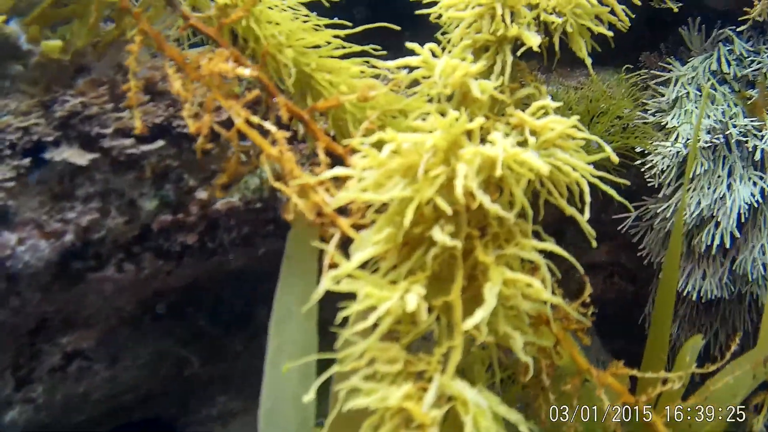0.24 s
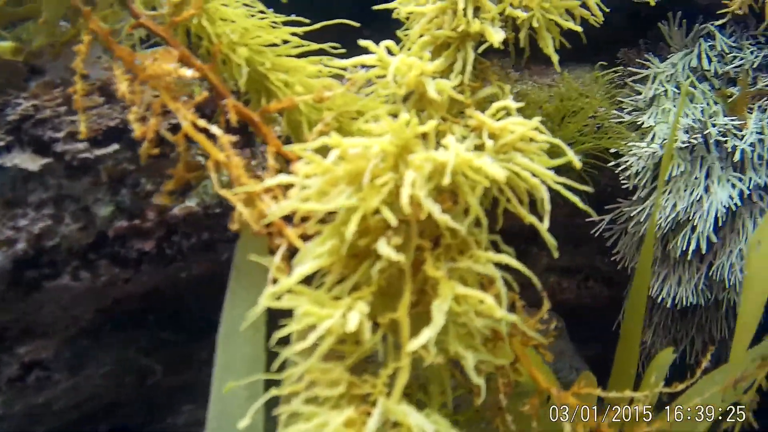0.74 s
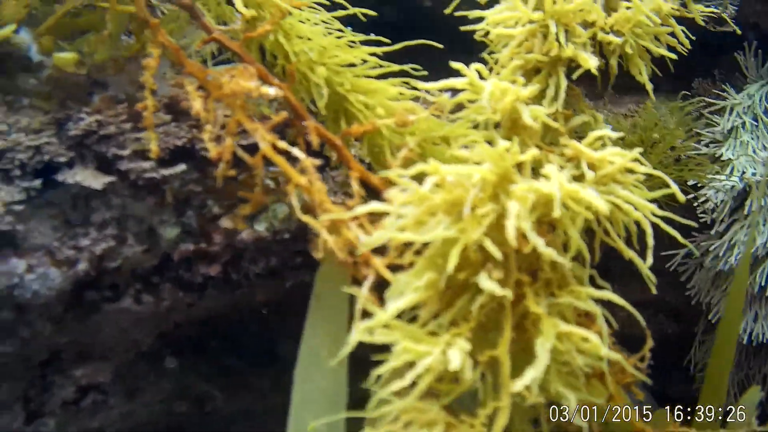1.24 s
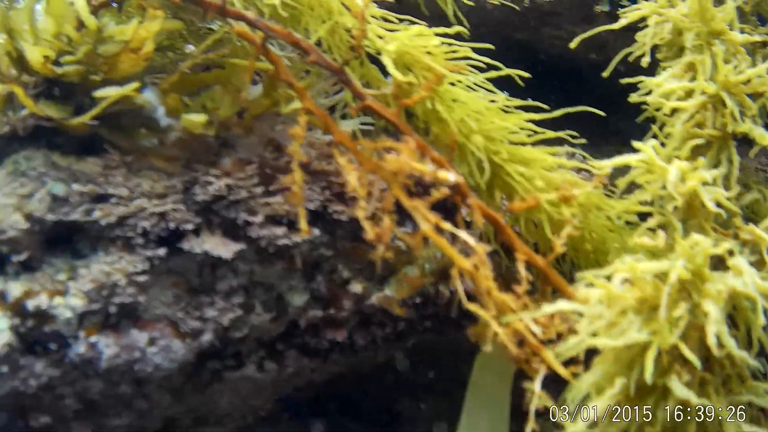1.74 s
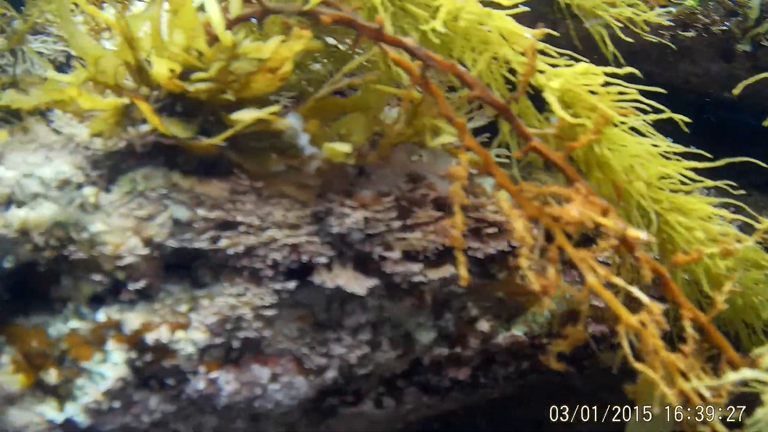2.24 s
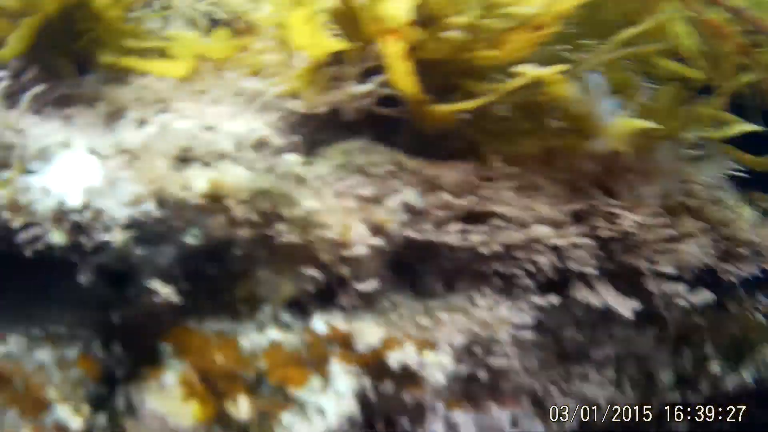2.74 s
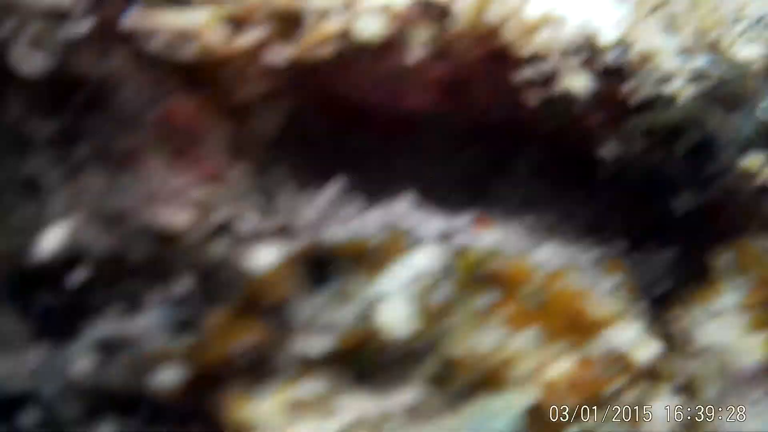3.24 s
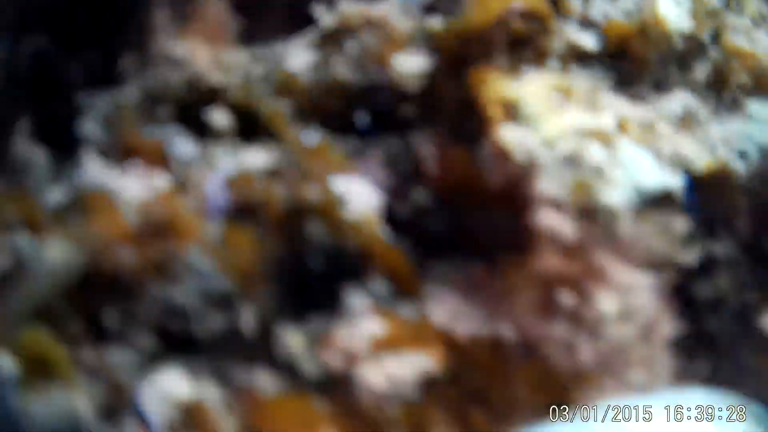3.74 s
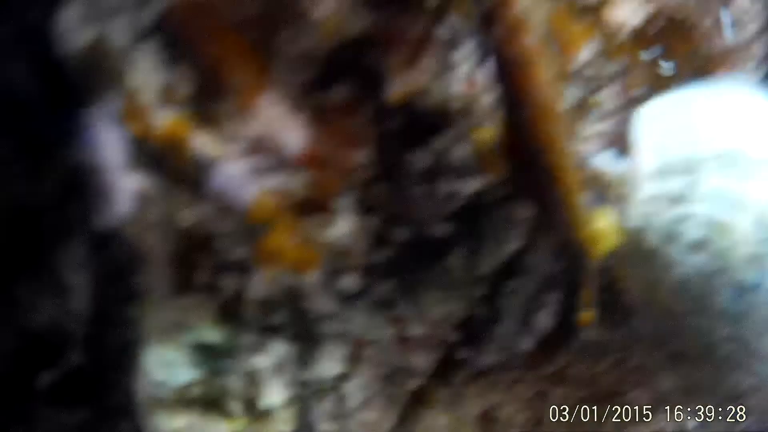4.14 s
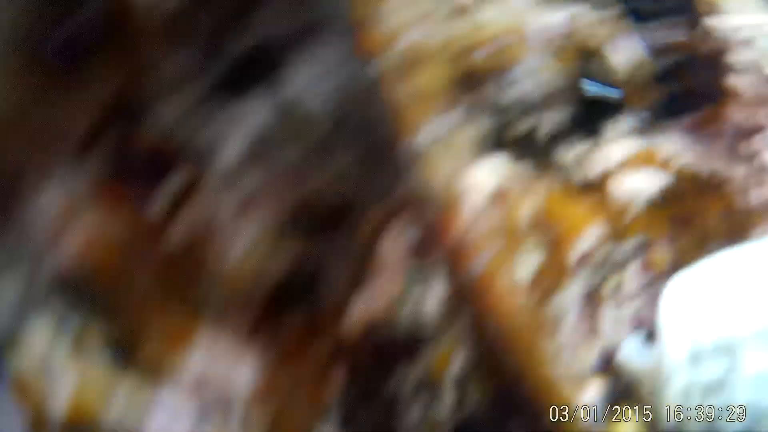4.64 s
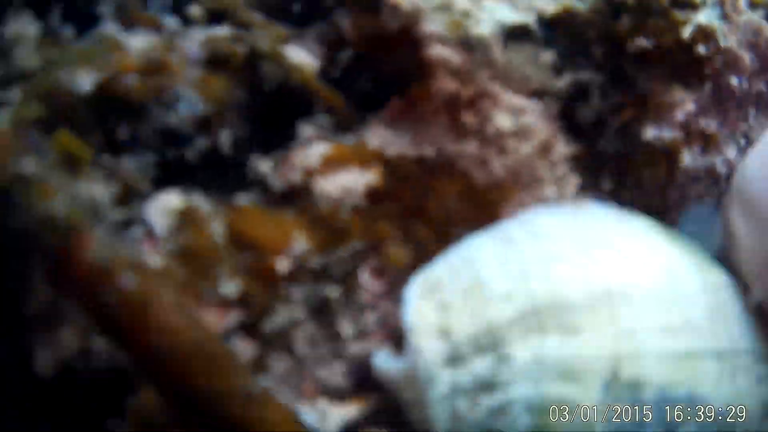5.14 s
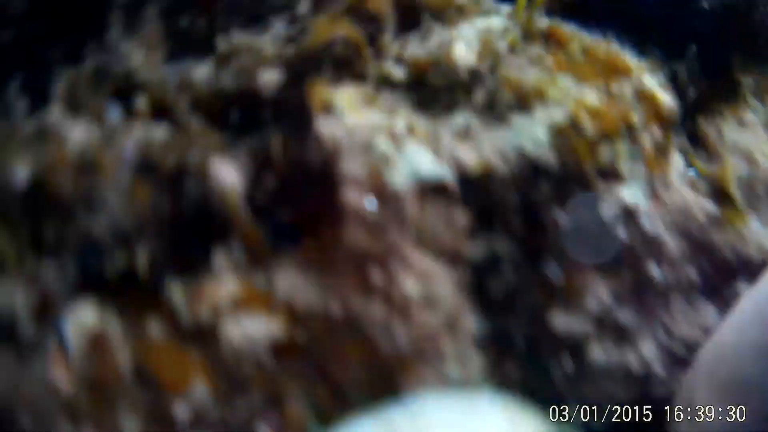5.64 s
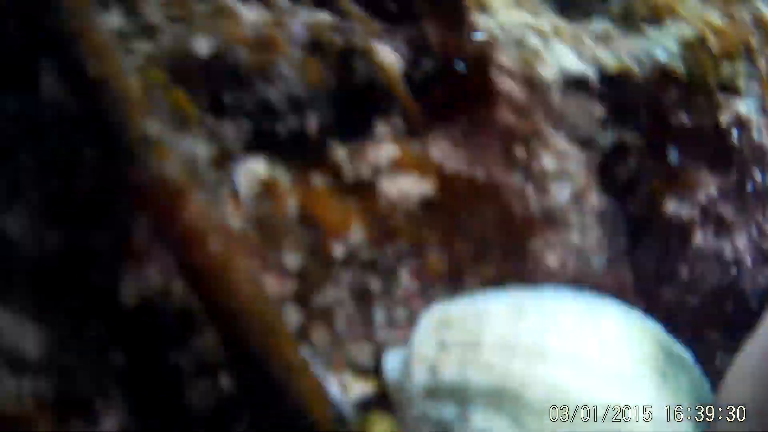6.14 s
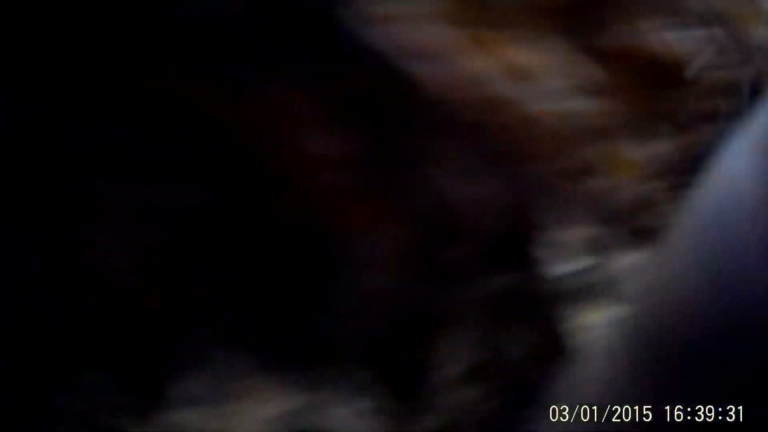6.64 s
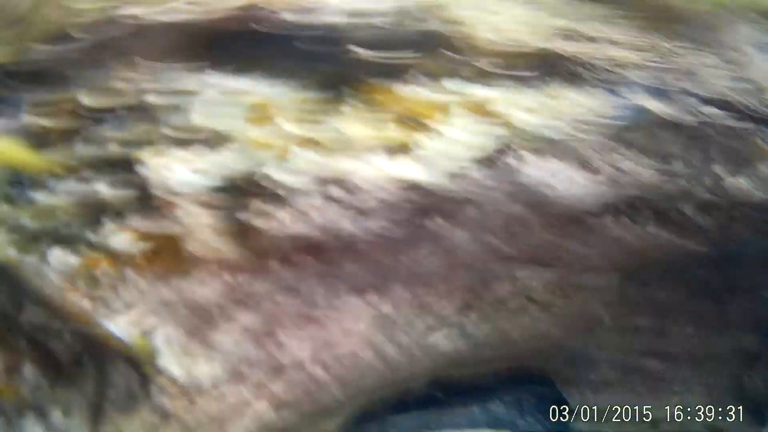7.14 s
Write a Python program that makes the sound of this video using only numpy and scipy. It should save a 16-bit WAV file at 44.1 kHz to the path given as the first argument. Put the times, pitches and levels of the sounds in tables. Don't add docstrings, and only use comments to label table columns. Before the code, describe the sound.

Heard from inside a sealed plastic housing in a shallow rock pool. From 0 to 2.5 seconds it is almost silent: faint hiss, a thin high warbling whine and tiny buzzing electronic ticks, stopping and restarting. From about 2.6 seconds light grit rubs and small ticks appear and swell. A sharp, loud plastic click lands near 3.4, followed by quiet rubbing and clearer circuit buzz. Around 3.9 to 4.1 a tight cluster of cracks and a harsh scrape comes with a low watery push. A lull with soft rubbing and fluttering electronics lasts until 4.9. Clicks at 4.9 and 5.0, then hollow knocks and a boomy thud at 5.25 to 5.5, scattered taps, and a bright crack at 5.9. After lighter taps, the heaviest knocks, shell clatter and gritty grinding run from 6.5 to 7.15, easing into a faint rub by 7.4.

```python
import sys
import numpy as np
from scipy import signal
from scipy.fft import rfft, irfft, next_fast_len
from scipy.io import wavfile
from scipy.ndimage import uniform_filter1d, map_coordinates

SR = 44100
rng = np.random.default_rng(int(sys.argv[2]) if len(sys.argv) > 2 else 0)


def rack_gain(trim_db):
    fader = np.asarray(trim_db, float)
    return 10 ** (fader / 20)


def generate_wav(signal):
    frames = np.transpose(np.atleast_2d(signal))
    scaled = np.clip(frames, -1, 1) * 32767
    pcm = np.round(scaled).astype(np.int16)
    wavfile.write(sys.argv[1], SR, pcm)


N = 325899


def unit(x):
    return x / np.sqrt(np.mean(x ** 2) + 1e-20)


def curves(rows):
    s, *cols = np.transpose(rows)
    return [np.interp(np.arange(N) / SR, s, c) for c in cols]


def wobble(rate_hz):
    knots = rng.standard_normal(int(N * rate_hz / SR) + 4)
    return map_coordinates(knots, [np.arange(N) * rate_hz / SR])


def filtered(x, response):
    m = next_fast_len(len(x) + 4096)
    return irfft(rfft(x, m) * response(np.fft.rfftfreq(m, 1 / SR)), m)[:len(x)]


def colour(points):
    f, db = np.transpose(points)
    return lambda hz: rack_gain(np.interp(np.log(hz + 1), np.log(f + 1), db))


def body(modes):
    def response(f):
        total = 0
        for k, (centre, width, db) in enumerate(modes):
            damping = 1j * f * width
            total = total + (-1) ** k * rack_gain(db) * damping / (centre * centre - f * f + damping)
        return total
    return response


def burst(rise_s, t60_s, response, push=0):
    t = np.arange(SR // 16) / SR
    envelope = (1 - np.exp(-t / rise_s)) * rack_gain(-60 * t / t60_s)
    puff = filtered((push + rng.standard_normal(len(t))) * envelope, response)
    return puff / np.abs(puff).max()


# (frequency [Hz], level [dB])
GRIT_COLOUR = [(1060, -13.5), (1800, -6.5), (2620, -1), (3000, -7.5), (3850, 3), (4260, 1.5), (5130, -0.5),
               (5580, 1.5), (6290, -5.5), (7790, 3.5), (10100, -14), (14800, -23), (16500, -51)]
# (frequency [Hz], level [dB])
SNAP_COLOUR = [(300, -10), (4000, -9.5), (8200, 7), (14000, -41)]
# (frequency [Hz], level [dB])
BLUNT_COLOUR = [(350, -10), (700, 3), (2300, 4), (4000, -15), (12000, -39)]
# (centre [Hz], width [Hz], level [dB])
LID_MODES = [(5890, 160, -3), (7800, 620, 5), (3340, 260, 5), (8560, 300, -31)]
# (centre [Hz], width [Hz], level [dB])
WALL_MODES = [(1262, 71, 7.5), (1411, 108, 8.5), (1946, 550, -5.5), (645, 230, -10)]
# (centre [Hz], width [Hz], level [dB])
CASE_MODES = [(297.7, 21, -1), (354, 82, 5), (528, 52.5, 3), (714, 330, -6.5), (202, 470, -9)]


def contacts():
    out, t = np.zeros(N + SR), np.arange(SR // 16) / SR
    grip = np.exp(-(t / 0.0053) ** 3)
    for s, click_db, hz, knock_db, thud_db in touches():
        wander = np.cumsum(rng.normal(0, .1, len(t)))
        ring_t60_s = 0.021 * np.clip(hz / 5400, .55, 1)
        ring = np.sin(2 * np.pi * hz * t + wander) * rack_gain(-60 * t / ring_t60_s) * (1 - np.exp(-t / 0.0002))
        hard = np.clip(hz / 2100 - .8, .05, 1)
        firm = np.clip((click_db + 32) / 12, .1, 1)
        crack = .5 * burst(0.000086, 0.013, colour(GRIT_COLOUR))
        crack += 0.53 * burst(0.001, 0.0028, colour(SNAP_COLOUR))
        click = grip * (0.66 * firm * ring + hard * crack)
        click += 0.24 * hard * burst(0.0016, 0.0097, body(LID_MODES))
        knock = burst(0.000084, 0.0012, body(WALL_MODES), push=1.44)
        knock += 0.41 * burst(0.00027, 0.011, colour(BLUNT_COLOUR))
        thud = burst(0.0027, 0.016, body(CASE_MODES))
        hit = rack_gain(click_db - 1.5) * click + rack_gain(knock_db - 4.5) * knock + rack_gain(thud_db - 2.0) * thud
        out[round(s * SR):][:len(t)] += hit
    return out[:N]


# (time [s], level [dB])
LID_TAPS = [(2.7165, -29), (3.1399, -26), (3.422, -7.5), (3.9362, 0), (3.9699, -6.5), (4.017, -24),
            (4.1971, -22.5), (5.1907, -7), (5.333, -7), (5.4463, -3.5), (5.604, -17), (5.7327, -24),
            (5.8203, -16), (5.8484, -9), (6.012, -17.5), (6.142, -21.5), (6.1843, -13.5), (6.221, -7.5),
            (6.531, -20), (6.6553, -4.5), (6.726, -6)]
# (time [s], level [dB], flight [s], rebound over tap [dB])
LID_REBOUNDS = [(3.3809, 7.5, 0.0092, -19.5), (3.912, -1, 0.017, -3), (4.034, -5.5, .0118, 6.5),
                (4.9076, -6, 0.017, -18), (5.0265, 0.5, 0.019, -12.5), (5.3841, -10, 0.013, -11),
                (5.914, 3.5, .0093, -7), (6.303, -5, 0.012, -13), (6.832, 2.5, 0.0082, -5.5),
                (7.1091, -7.5, 0.0122, 3.5)]
# (time [s], level [dB], ring [Hz])
SHELL_CHIPS = [(2.8089, -30.5, 6700), (3.0107, -27.5, 9250), (3.0562, -27, 6160), (3.3054, -23, 7000),
               (3.961, -16, 3230), (4.098, -22, 3700), (4.123, -14, 6700), (5.438, -15, 7300),
               (5.4914, -15.5, 3500), (5.5175, -4, 5680), (5.597, -22, 7500), (5.6273, -8.5, 7540),
               (5.9585, -19, 7340), (5.9855, -16.5, 7100), (6.001, -23, 7800), (6.0258, -14.5, 7020),
               (6.5871, 0.5, 7400), (6.611, -5.5, 7700), (6.622, -6, 7460), (6.637, -6.5, 4770),
               (6.647, 1, 6820), (6.67, -2.5, 2230), (6.809, -16.5, 6740), (6.871, -17, 7100),
               (6.9232, -8, 9180), (6.9613, -2.5, 7800), (6.982, -10.5, 7140), (7.0088, -11, 8250),
               (7.0452, -3.5, 7270)]
# (time [s], knock [dB], click [dB], click ring [Hz])
WALL_KNOCKS = [(2.588, -41, -50, 3170), (2.692, -37, -42, 3100), (3.366, -17.5, -17, 3040),
               (3.7206, -18.5, -12, 1800), (3.8953, -17.5, -13, 3180), (4.339, -29.5, -23.5, 3340),
               (5.1452, -31.5, -52, 1720), (5.2202, -34, -20.5, 2170), (5.2314, -20.5, -19, 2600),
               (5.2523, -2, -9.5, 2420), (5.2634, -24, -18, 2700), (5.3569, -3, -10, 4240),
               (5.4026, -42, -14.5, 3600), (5.475, -21.5, -36, 1750), (5.7768, -29, -36, 2240),
               (5.868, -26, -23.5, 3130), (5.9324, -22, -23, 3220), (6.3972, -9, -14, 1900),
               (6.5148, 1.8, -17, 4240), (6.5586, -22, -22, 1740), (6.577, -7, 6, 1940),
               (6.7335, 2.5, 9.5, 2570), (6.94, -27, 0, 7800), (7.0325, -13, -1.5, 3600),
               (7.071, -16.5, 0.8, 2640), (7.097, -15, -5.5, 3400), (7.136, -12, -10, 4750)]
# (time [s], knock [dB], thud [dB])
BLUNT_BUMPS = [(3.381, -27, -19.5), (3.391, -17.5, -15.5), (3.91, -35, -49), (3.9331, -29, -14.5),
               (4.0349, -32, -22), (4.045, -51, -20.5), (5.313, -17, -50), (5.357, -40, -6),
               (5.4356, -33, -16.5), (5.902, -27, -34), (5.858, -26.5, -45), (6.14, -38, -38),
               (6.27, -29.5, -63), (6.57, -10, -29), (6.607, -13, -30), (6.6237, -41, -32),
               (6.669, -29, -24), (6.697, -19.5, -21.5), (6.725, -52, -47), (6.81, -12, -45),
               (6.84, -21.5, -22), (6.8712, -16, -19), (6.9237, -34, -15), (7.0444, -29, -33),
               (7.179, -11.5, -55), (7.24, -25.5, -42), (7.265, -22.5, -53)]
LID_HZ, LID_SPREAD_HZ = 5520, 54
TAP_KNOCK_DB, TAP_THUD_DB = -64, -38.5
CHIP_KNOCK_DB, CHIP_THUD_DB = -27, -35
KNOCK_THUD_DB = -16
SILENT_DB = -120


def touches():
    taps = list(LID_TAPS)
    for s, db, flight_s, rebound_db in LID_REBOUNDS:
        taps += [(s, db), (s + flight_s, db + rebound_db)]
    pitch = LID_HZ + LID_SPREAD_HZ * rng.standard_normal(len(taps))
    return ([(s, db, hz, db + TAP_KNOCK_DB, db + TAP_THUD_DB) for (s, db), hz in zip(taps, pitch)]
            + [(s, db, hz, db + CHIP_KNOCK_DB, db + CHIP_THUD_DB) for s, db, hz in SHELL_CHIPS]
            + [(s, click, hz, knock, knock + KNOCK_THUD_DB) for s, knock, click, hz in WALL_KNOCKS]
            + [(s, SILENT_DB, LID_HZ, knock, thud) for s, knock, thud in BLUNT_BUMPS])


# (time [s], peak [dB], centre [Hz])
GRAIN_TICKS = [(2.59, -40.5, 3170), (2.6341, -47, 3800), (2.6722, -51, 4570), (2.7008, -45, 4700),
               (2.8673, -37, 6200), (2.9026, -43, 5200), (2.941, -41, 4700), (2.963, -36, 3800),
               (3.002, -38, 4100), (3.016, -34, 5600), (3.1251, -31, 6100), (3.1681, -35, 6800),
               (3.1911, -35, 4100), (3.2545, -31, 5330), (3.275, -27, 4400), (3.3567, -19, 6400),
               (3.4113, -34, 4400), (3.4393, -31, 6400), (3.862, -38, 5400), (3.918, -7, 4770),
               (4.018, -17, 5000), (4.1656, -31, 5200), (4.217, -27, 6460), (5.3196, -32, 6800),
               (5.3624, -14, 3700), (5.368, -6.5, 2850), (5.375, -18, 5100), (5.4131, -16, 1700),
               (5.419, -23, 2300), (5.4645, -25, 2600), (5.4883, -31, 4500), (5.5228, -6.5, 5850),
               (5.5844, -23, 5000), (5.711, -24, 6300), (5.7507, -32, 6700), (5.854, -14, 6600),
               (5.856, -14.5, 5000), (5.8863, -34, 4600), (5.996, -17.5, 7000), (6.047, -20.5, 5060),
               (6.0952, -38, 3770), (6.2074, -29, 5700), (6.2695, -40, 4990), (6.3509, -23.5, 4770),
               (6.362, -32, 6070), (6.5004, -28, 5100), (6.5963, -8, 4800), (6.6073, -17, 6400),
               (6.698, -22, 5700), (6.632, -9.5, 3300), (6.8176, -30, 6400), (6.8842, -15, 6500),
               (6.9041, -15, 6200), (6.919, -8, 3600), (7.0133, -11, 7150), (7.038, -9, 6000),
               (7.0654, -18, 3700), (7.0758, -3, 2980), (7.0904, -20, 5600), (7.189, -26, 6000),
               (4.902, -37.5, 3500), (5.5, -19, 5300), (6.925, -10, 2500), (6.934, -6, 2200),
             (6.943, -1, 2740), (6.842, -17, 2760), (6.648, -5, 3400), (4.427, -40, 6500),
             (4.603, -31, 5500), (2.7, -39, 13000), (4.5, -31, 5100), (6, -9, 2100), (7.137, -10, 2100),
             (7.7, -13, 4500), (3.721, -55, 2700), (4.712, -33.5, 4100), (3.908, -5, 5100),
             (3.391, -9, 860)]
# (time [s], peak [dB])
GLASSY_SPARKS = [(3.3662, -25), (3.3808, -5), (3.9074, -30), (4.0337, -21), (4.0446, -17), (4.9072, -36),
                 (5.0259, -11.5), (5.0456, -24), (5.19, -26), (5.3322, -34), (5.3557, -29), (5.4455, -19),
                 (5.518, -20), (5.5981, -20), (5.8475, -45), (5.9146, 0.5), (5.9857, -30), (6.302, -41),
                 (6.515, -32), (6.5764, -19), (6.5864, -11), (6.6068, -20), (6.6367, -7), (6.733, -28),
                 (6.732, -6), (6.832, -2.5), (6.9226, -13), (6.9383, -2.5), (7.0079, -24), (7.0316, -21),
                 (7.0453, -19), (7.0695, -6)]
# (time [s], peak [dB], pitch [Hz])
CASE_BOOMS = [(5.252, -20, 376), (5.356, -1.5, 376), (5.421, -28, 290), (5.868, -23, 540),
              (6.397, -33, 403), (6.514, -28, 547), (6.57, -16, 327), (6.62, -9, 340), (6.733, -32, 353),
              (6.874, -14.5, 358), (6.92, -11, 387), (7.039, -13.5, 333), (7.075, -22, 334),
              (7.1, -18, 318), (7.138, -19, 533)]
SPARK_HZ, TICK_WIDTH, BOOM_T60_S = 12100, 1.02, 0.045


def grains():
    out, t = np.zeros(N + SR), np.arange(SR // 16) / SR
    for s, db, hz in GRAIN_TICKS:
        band = body([(hz, TICK_WIDTH * hz, 0)])
        out[round(s * SR):][:len(t)] += rack_gain(db - 3.0) * burst(0.00031, 0.0086, lambda f: band(f) ** 3)
    for s, db in GLASSY_SPARKS:
        out[round(s * SR):][:len(t)] += rack_gain(db - 2.5) * burst(.0002, 0.0033, body([(SPARK_HZ, 5000, 0)]))
    for s, db, hz in CASE_BOOMS:
        envelope = rack_gain(db - 1 - 60 * t / BOOM_T60_S) * (1 - np.exp(-t / 0.00077))
        out[round(s * SR):][:len(t)] += envelope * np.sin(2 * np.pi * hz * t)
    return out[:N]


# (frequency [Hz], level [dB])
SILT_COLOUR = [(1060, -26), (2150, -16), (2650, 2), (3250, 3), (4140, -1.5), (5340, 0.5), (6470, -2.5),
               (7030, 3.5), (14600, -22), (16000, -24)]
# (time [s], peak [dB], pitch [Hz], length [s])
SQUEAKS = [
    (.705, -59, 545, .03),
    (2.885, -34.5, 305, .055),
    (6.896, -26, 7750, .028),
]


def drag():
    on = np.arange(N) / SR > RUBBING[0][0]
    grit_db, wall_db, case_db = pressure()
    hard = np.clip((grit_db + 53.5) / 14, 0, 1)
    smooth = slips(per_s=9000, spread_db=1.7, clump_db=3.4, patch_db=5) * rack_gain(2.2 * wobble(30))
    fine = slips(per_s=5000, spread_db=2.5, clump_db=2.6, patch_db=6)
    coarse = slips(per_s=2100, spread_db=4.0, clump_db=2.0, patch_db=-4)
    grind = unit(filtered(fine, colour(GRIT_COLOUR)))
    grind += 0.27 * unit(filtered(fine + coarse, body(LID_MODES)))
    rub = unit(filtered(smooth, colour(SILT_COLOUR)))
    grit = np.sqrt(hard) * grind + np.sqrt(1 - hard) * rub
    shove = np.sqrt(hard) * coarse + 2.8 * smooth
    wall = unit(filtered(shove, body(WALL_MODES)))
    case = unit(filtered(shove + 2 * rng.standard_normal(N), body(CASE_MODES)))
    out = on * (rack_gain(grit_db + 2.0) * grit + rack_gain(wall_db + 0.5) * wall + rack_gain(case_db + 0.5) * case)
    for s, db, hz, length_s in SQUEAKS:
        t = np.arange(round(length_s * SR)) / SR
        out[round(s * SR):][:len(t)] += rack_gain(db) * np.hanning(len(t)) * np.sin(2 * np.pi * hz * t)
    return out


def slips(per_s, spread_db, clump_db, patch_db):
    sizes = np.minimum(rng.exponential(size=N), 3)
    kicks = (rng.random(N) < per_s / SR) * rng.standard_normal(N) * rack_gain(spread_db * sizes)
    z = signal.stft(kicks * rack_gain(clump_db * wobble(200)), nperseg=128)[2]
    field = uniform_filter1d(rng.standard_normal(z.shape), size=3, axis=0)
    field = uniform_filter1d(field, size=6, axis=1)
    patches = rack_gain(patch_db * np.tanh(unit(field)))
    return unit(signal.istft(z * patches, nperseg=128)[1][:N])


# (time [s], level [dB])
RUBBING = [(2.494, -93), (2.844, -63), (2.95, -56), (3.298, -51.5), (3.482, -60.5), (3.766, -67),
           (3.881, -46), (4.2, -46), (4.27, -66.5), (4.48, -51), (4.7, -55), (4.85, -73), (5.12, -76),
           (5.3, -56.5), (5.84, -55.5), (6.55, -65), (7.229, -50.5), (7.388, -56.5)]
# (time of most pressure [s], level [dB], rise [s], fall [s])
GRIT_STROKES = [(2.676, -55.5, 0.0055, 0.13), (2.905, -50.5, 0.11, 0.071), (3.008, -50.5, .02, .06),
                (3.06, -45.5, 0.035, .08), (3.135, -45, 0.054, 0.092), (3.382, -32, 0.12, 0.11),
                (3.921, -21, 0.036, 0.054), (4.044, -30.5, 0.072, 0.032), (5.045, -52.5, 0.52, 0.045),
                (5.366, -27, 0.025, 0.01), (5.438, -35, 0.063, 0.083), (5.513, -36, 0.076, 0.061),
                (5.621, -36.5, 0.097, 0.24), (5.855, -41, 0.007, 0.11), (6.006, -41, 0.058, 0.17),
                (6.171, -49.5, 0.04, 0.34), (6.579, -24, 0.018, 0.21), (6.649, -28, 0.052, 0.13),
                (6.82, -29.5, 0.039, 0.088), (6.937, -14.5, 0.055, 0.052), (6.88, -28.5, 0.034, 0.15),
                (7.046, -25, 0.031, 0.094), (7.173, -30, 0.17, 0.052), (6.805, -42, .1, .02),
                (4.199, -36.5, .03, 0.046), (3.56, -57, .05, .05), (3.625, -55, .08, .08),
                (3.69, -58.5, .04, .06)]
# (time of most pressure [s], wall level [dB], rise and fall [s], case over wall [dB])
FLAT_SHOVES = [(2.911, -53.5, 0.081, 9), (3.687, -54, 0.086, -1), (4.06, -48.5, 0.11, 9.5),
               (4.575, -55, 0.24, 9), (5.039, -58, 0.077, 3), (5.029, -42.5, 0.0069, 8),
               (3.395, -34, 0.018, 12), (5.732, -45.5, 0.054, 6.5), (3.2, -52.5, 0.32, 2),
               (5.262, -35.5, 0.061, -11), (5.339, -43, 0.038, 3.5), (5.366, -18, 0.0096, 0.5),
               (5.437, -36.5, 0.16, 3.5), (5.511, -45.5, 0.057, 6.5), (5.873, -37, 0.06, -0.5),
               (5.98, -42, 0.2, -3.5), (6.171, -58, 0.032, 20), (6.311, -55.5, 0.45, 0.5),
               (6.517, -42.5, 0.052, -5), (6.585, -23, 0.021, 1), (6.7, -54.5, 0.23, 12),
               (6.825, -43, 0.087, 8), (6.93, -34, 0.11, 5.5), (7.052, -25, 0.03, -2),
               (7.095, -49, 0.24, 19), (7.174, -35, 0.048, -1.5)]
RUB_WALL_DB, RUB_CASE_DB = -5, -1
STROKE_WALL_DB, STROKE_CASE_DB = -11, -9
STROKE_FALL_DB = 28


def pressure():
    t = np.arange(0, N / SR + 1, 1 / 1000)

    def peak(s, db, rise_s, fall_s):
        return db - STROKE_FALL_DB * np.maximum((s - t) / rise_s, (t - s) / fall_s)

    rub = np.interp(t, *np.transpose(RUBBING))
    stroke = np.max([peak(*row) for row in GRIT_STROKES], axis=0)
    wall = np.max([peak(s, db, span, span) for s, db, span, _ in FLAT_SHOVES], axis=0)
    case = np.max([peak(s, db + over, span, span) for s, db, span, over in FLAT_SHOVES], axis=0)
    grit_db = np.maximum(rub, stroke)
    wall_db = np.max([rub + RUB_WALL_DB, stroke + STROKE_WALL_DB, wall], axis=0)
    case_db = np.max([rub + RUB_CASE_DB, stroke + STROKE_CASE_DB, case], axis=0)
    return curves(np.transpose([t, grit_db, wall_db, case_db]))


# (time [s], level [dB])
SURGE_LEVEL = [
    (0.0, -82),
    (0.93, -79),
    (1.85, -77.5),
    (4.09, -49),
    (4.2, -53),
    (6.91, -42.5),
    (7.39, -61),
]
# (frequency [Hz], level [dB])
SWELL_COLOUR = [(8.8, -23), (15, 11), (29, 0), (81, -14), (168, -39), (233, -30), (250, -23), (320, -25),
                (550, -120)]
# (time [s], peak [dB], bounce [Hz])
LURCHES = [(3.888, -19, 82.5), (3.914, -21, 45.3), (3.934, -27, 45.7), (4.04, -14.5, 59.6),
           (4.131, -19, 50.6), (4.487, -28.5, 47.3), (5.354, -15.5, 57.3), (5.44, -14.5, 200),
           (5.69, -32, 200), (6.566, -20.5, 39.3), (6.599, -23, 40.6), (6.728, -22, 119), (6.919, -25, 51),
           (7.135, -29, 153)]


def surge():
    lumps = rack_gain(4.1 * wobble(4.815)) * filtered(rng.standard_normal(N), colour(SWELL_COLOUR))
    out = np.pad(rack_gain(curves(SURGE_LEVEL)[0] + 8.0) * unit(lumps), (0, SR))
    t = np.arange(SR // 5) / SR
    for s, db, hz in LURCHES:
        envelope = rack_gain(db + 8.0 - 14.3 * hz * t) * (1 - np.exp(-t * hz * 9))
        out[round(s * SR):][:len(t)] += envelope * np.sin(2 * np.pi * hz * t)
    return out[:N]


# (time [s], gain [dB])
AUTO_GAIN = [
    (1.4, 0),
    (1.6, -2),
    (2.3, -2),
    (2.8, 5),
    (3.1, 8),
    (4.3, 9),
    (6.5, 11),
    (6.7, 5),
    (7.39, 6),
]
# (frequency [Hz], level [dB])
HISS_COLOUR = [(12, -3), (20, 1.5), (102, -7.5), (1020, -24), (1320, -26), (4050, -30.5), (8890, -30),
               (9670, -35), (10500, -31.5), (15200, -36), (16500, -43)]
# (frequency [Hz], level [dB], phase [turns])
WHINE_TONES = [(9410.9, -86, 0), (9483.1, -78, .5), (9555.3, -78, .5), (9627.5, -86, 0)]
# (start [s], end [s], level [dB])
IDLE_TICKING = [
    (0, 0.242, -71.5),
    (0.25, 1.455, -69),
    (2.014, 2.293, -69.5),
    (3.054, 6.6, -76),
]
# (centre [Hz], width [Hz], level [dB])
COIL_MODES = [(5320, 100, 4), (7100, 320, 6), (6460, 1100, -10), (7800, 250, -11), (9000, 540, -3.5),
              (11300, 1300, -7.5)]
# (frequency [Hz], level [dB])
BUZZ_COLOUR = [(3900, -77), (4300, -70), (4750, -77), (5270, -62), (5800, -76), (6300, -70), (7080, -64),
               (7700, -69), (7950, -84), (8500, -78), (10500, -82), (12000, -80), (14500, -85),
               (16500, -95)]
# (time [s], first rate [Hz], second rate [Hz])
PAIRED_WRITES = [(.05, 2330, 2328), (.123, 2360, 2576), (3.074, 2522, 2258), (3.142, 2322, 2142),
                 (3.278, 2370, 2294), (4.888, 2354, 2002), (5.93, 2162, 2294), (3.426, 2484, 2046),
                 (3.496, 2374, 1982), (3.564, 2646, 2082), (3.634, 2644, 2108), (3.708, 2322, 2144),
                 (3.778, 2160, 2084), (4.227, 2330, 1878), (4.307, 2402, 1910), (4.372, 2648, 1910),
                 (4.444, 2644, 2266), (4.603, 2326, 2050), (4.678, 2358, 2108), (4.749, 2356, 2082),
                 (4.82, 2296, 2610), (4.964, 2438, 2026), (5.061, 2086, 2652), (5.111, 2342, 1982),
                 (5.265, 2436, 2612), (5.543, 2358, 2356), (6.064, 2358, 2108), (6.247, 2360, 2358),
                 (6.367, 1982, 2174), (6.438, 2356, 2160)]
# (time [s], rate [Hz])
LONE_WRITES = [(.009, 2358), (.202, 2202), (4.07, 2198), (4.175, 2122), (4.52, 1982), (4.568, 2370),
               (5.196, 2050), (5.644, 2026), (5.688, 2358), (5.72, 2074), (5.764, 2002), (5.796, 2538),
               (6.03, 2326), (6.152, 2298), (6.2, 2002), (6.314, 2614), (6.534, 2242)]
WRITE_GAP_S = .028


def circuits():
    t = np.arange(N) / SR
    hiss = rack_gain(-62.5) * unit(filtered(rng.standard_normal(N), colour(HISS_COLOUR)))
    tones = sum(rack_gain(db + 3) * np.sin(2 * np.pi * (hz * t + turns + .25)) for hz, db, turns in WHINE_TONES)
    count = np.floor(np.cumsum(290 * rack_gain(4.1 * wobble(130))) / SR)
    ticks = np.diff(count, prepend=0) * rack_gain(rng.normal(0, 0.31, N))
    idle_level = sum(rack_gain(db) * (t > start) * (t < end) for start, end, db in IDLE_TICKING)
    idle = unit(filtered(ticks, body(COIL_MODES))) * idle_level

    writes = list(LONE_WRITES)
    for s, first_hz, second_hz in PAIRED_WRITES:
        writes += [(s, first_hz), (s + WRITE_GAP_S, second_hz)]
    trains, u = np.zeros(N), np.arange(round(.026 * SR)) / SR
    fade = np.clip(np.minimum(u, u[::-1]) / .0015, 0, 1)
    for s, hz in writes:
        overtones = hz * np.arange(2, 8)[:, None]
        level = np.sqrt(2) * colour(BUZZ_COLOUR)(overtones) * rack_gain(rng.normal(0, 2, overtones.shape))
        buzz = np.sum(level * np.sin(2 * np.pi * overtones * u), axis=0)
        trains[round((s - .003) * SR):][:len(u)] += fade * buzz
    return rack_gain(curves(AUTO_GAIN)[0]) * (hiss + tones + idle + trains)


def scene():
    return (contacts() + grains() + drag() + surge() + circuits())[None]


def roll_off(x):
    return signal.sosfilt(signal.butter(12, 16970, fs=SR, output="sos"), x)


def record(dry):
    flat = dry / (1 + np.abs(dry / .7) ** 6) ** (1 / 6)
    soft = filtered(flat[0], colour([(15500, 0), (15900, -16), (16800, -20), (17000, -50)]))
    return roll_off(soft[None])


dry = scene()
out = record(dry)
generate_wav(out)
```